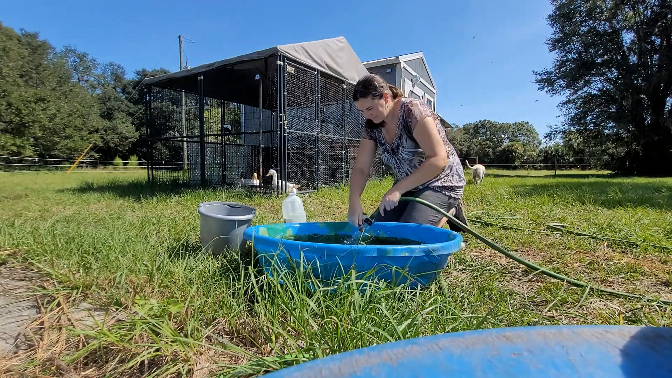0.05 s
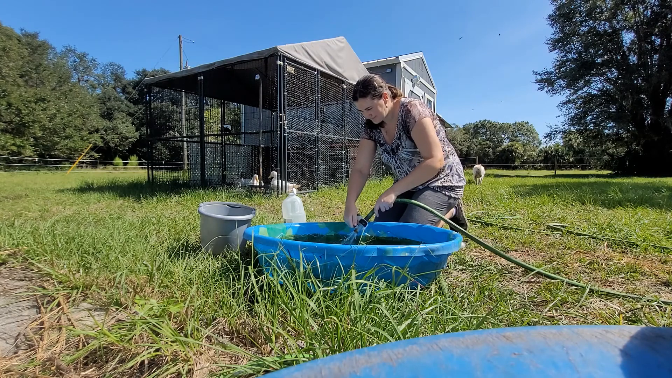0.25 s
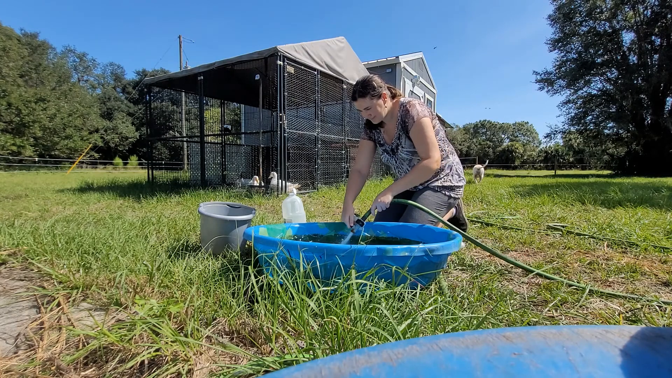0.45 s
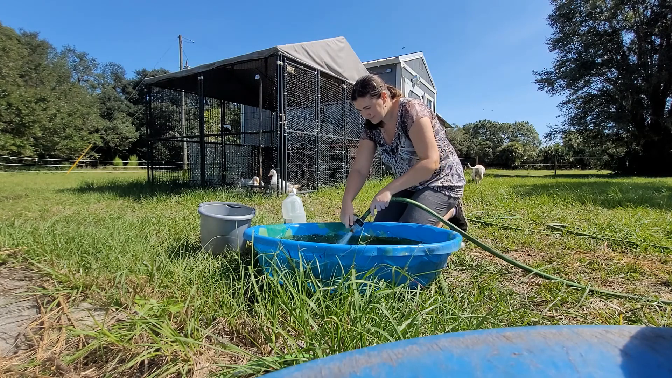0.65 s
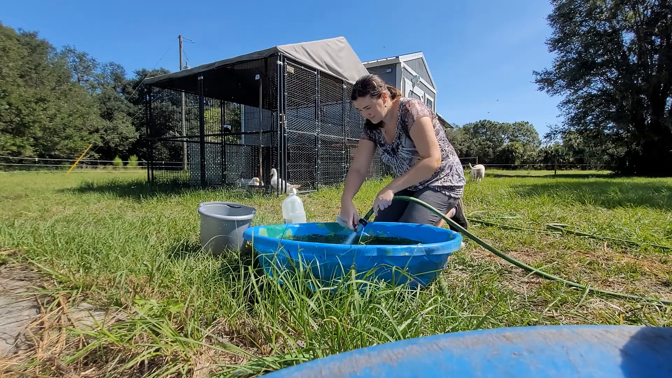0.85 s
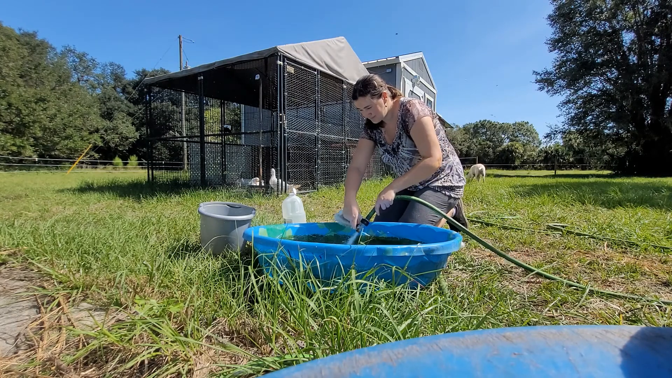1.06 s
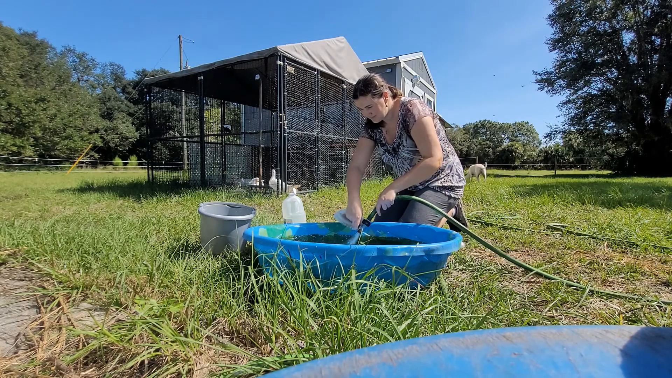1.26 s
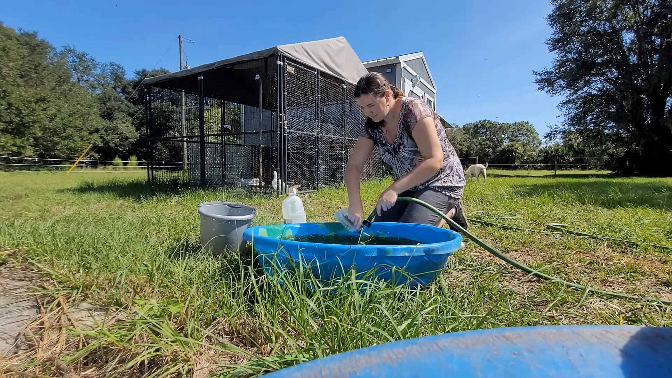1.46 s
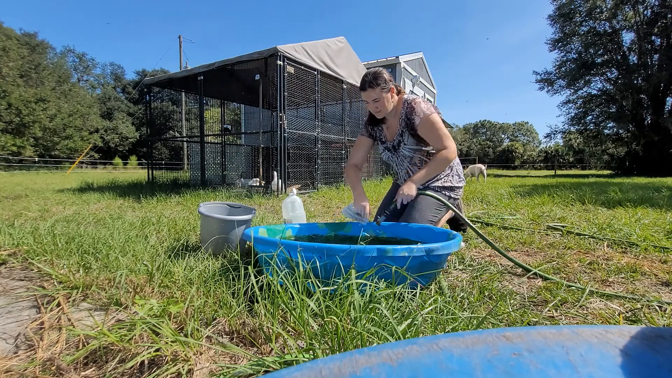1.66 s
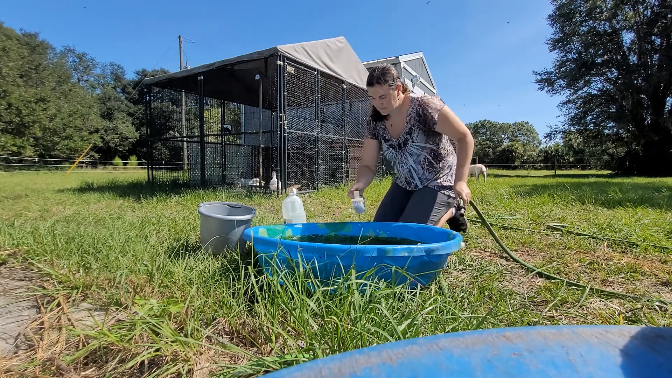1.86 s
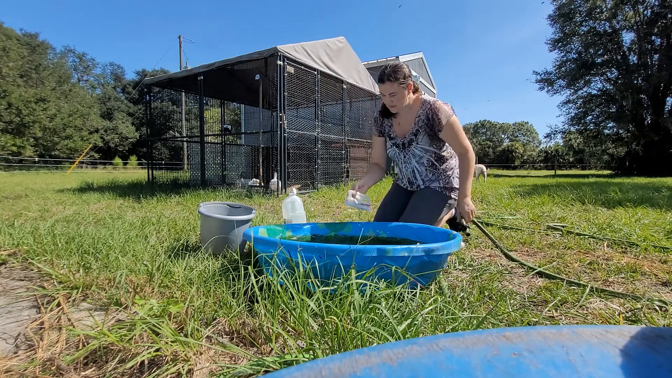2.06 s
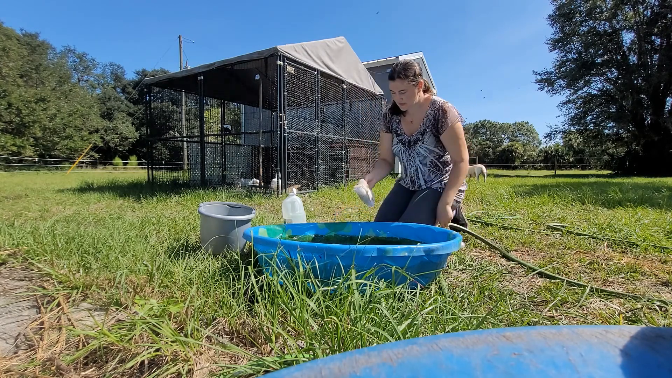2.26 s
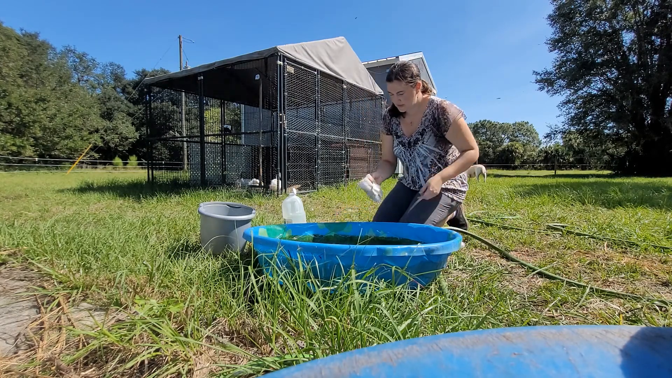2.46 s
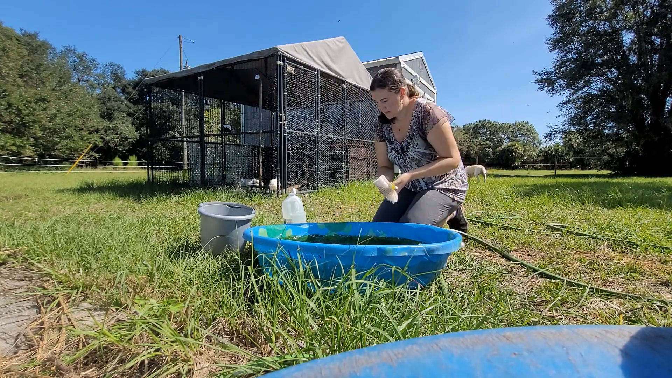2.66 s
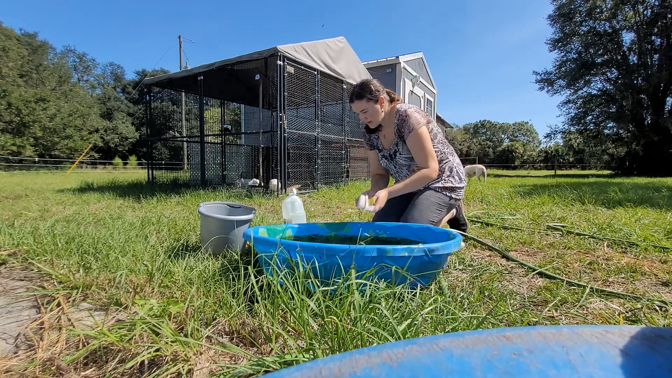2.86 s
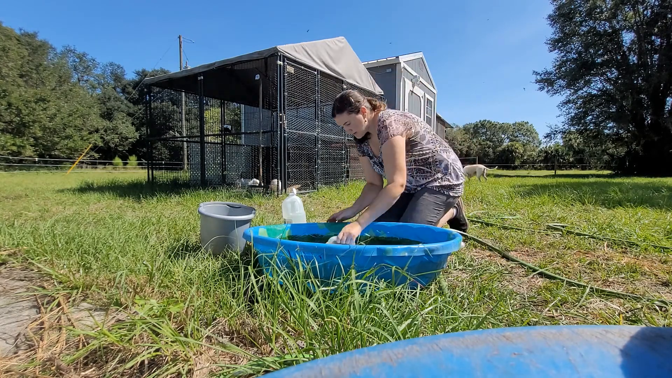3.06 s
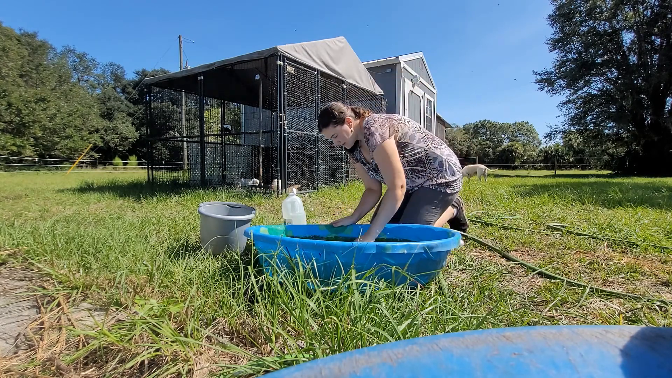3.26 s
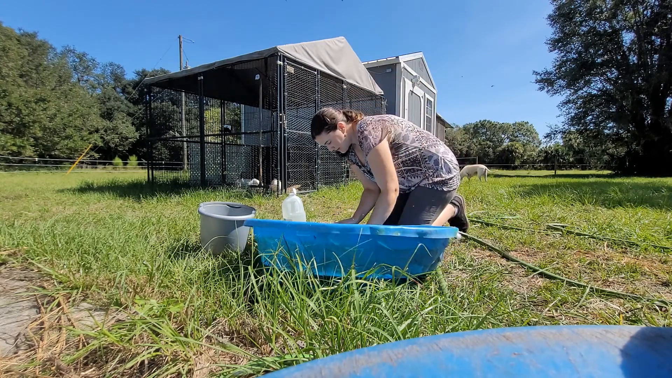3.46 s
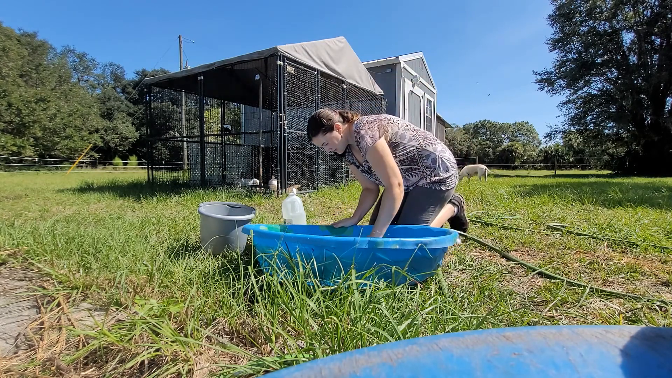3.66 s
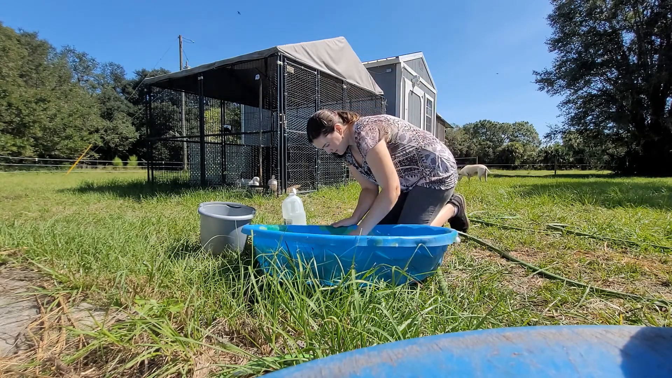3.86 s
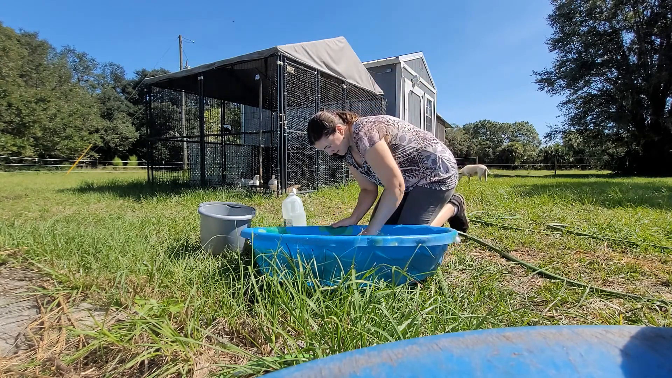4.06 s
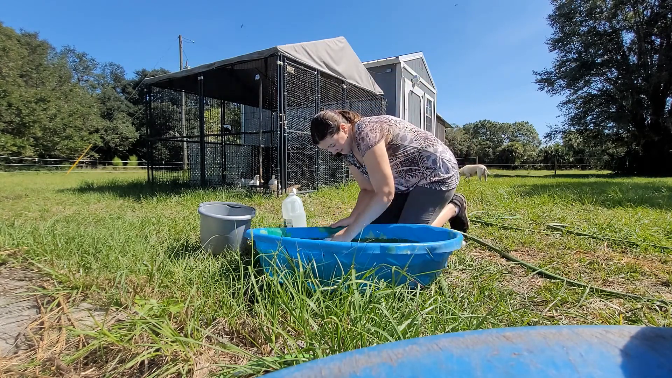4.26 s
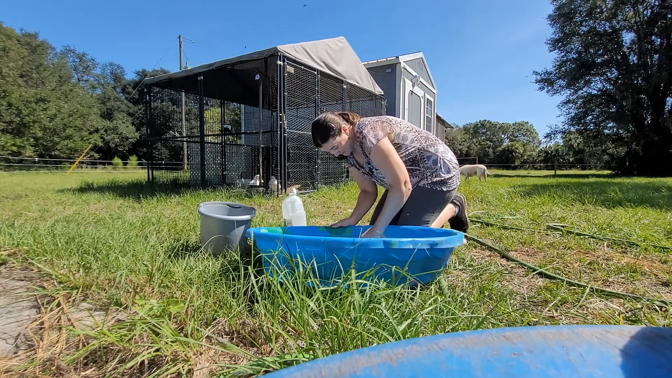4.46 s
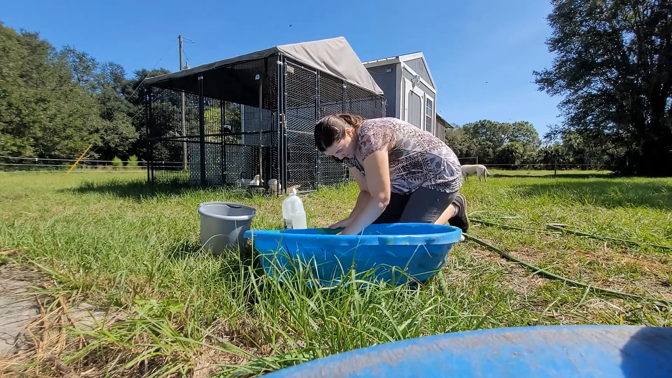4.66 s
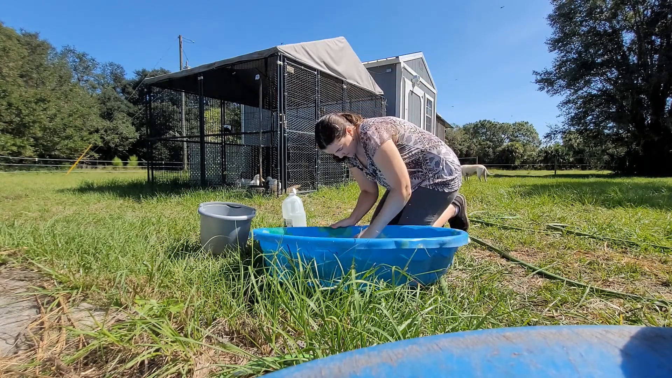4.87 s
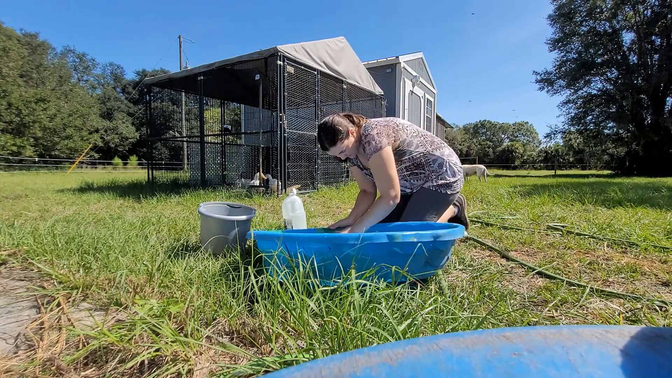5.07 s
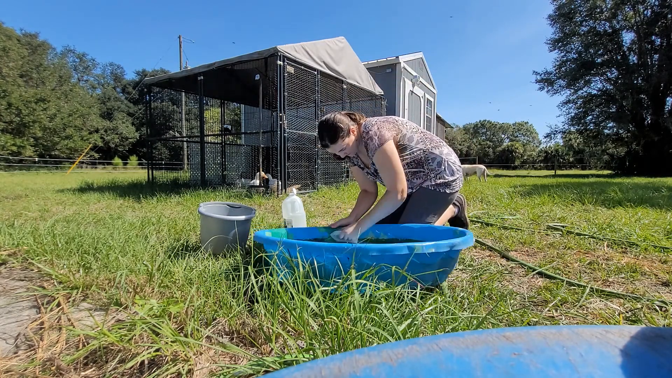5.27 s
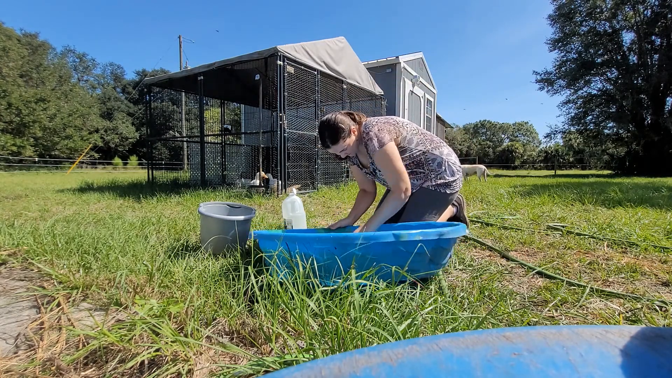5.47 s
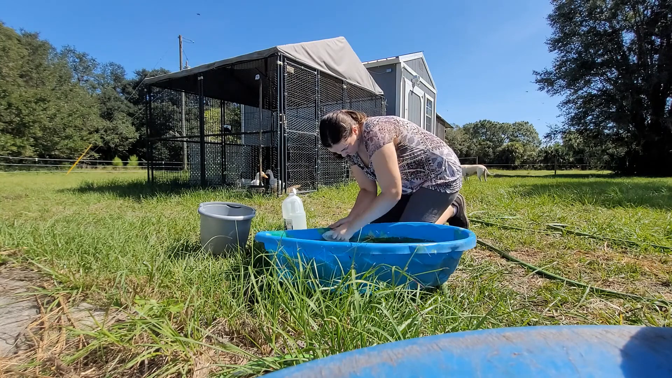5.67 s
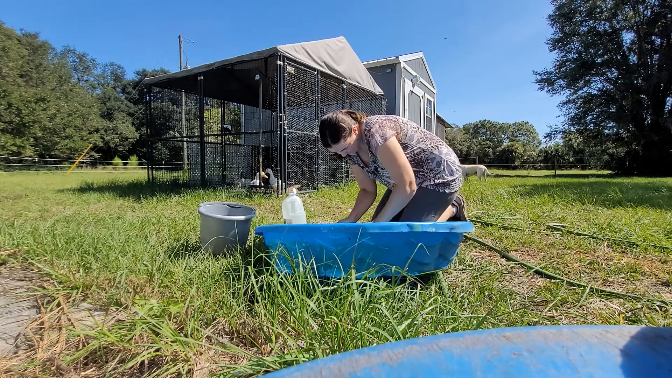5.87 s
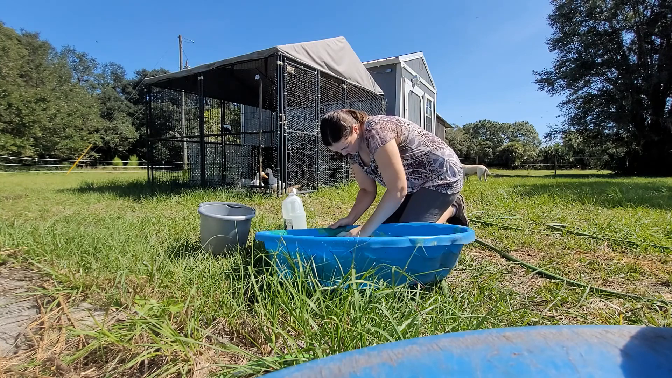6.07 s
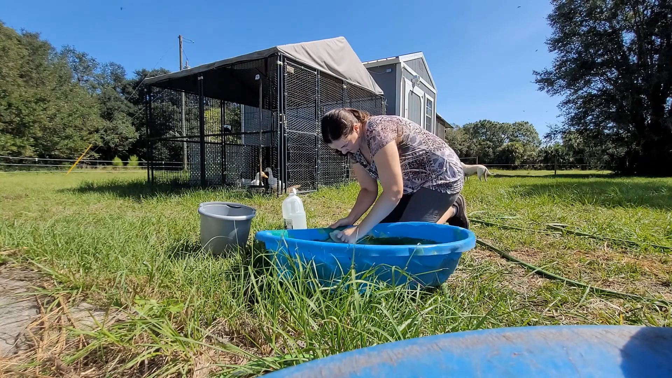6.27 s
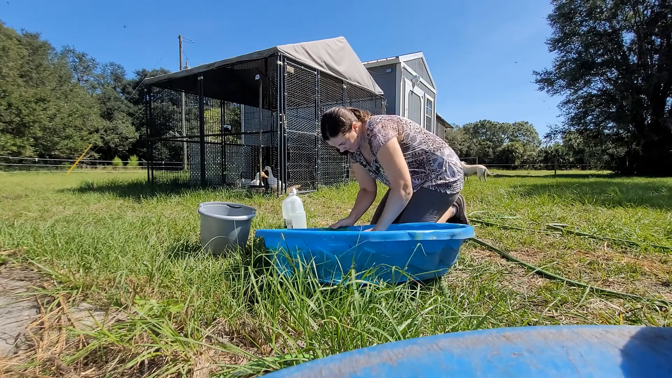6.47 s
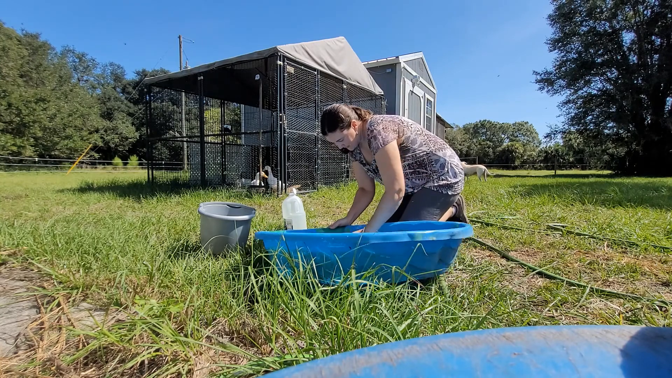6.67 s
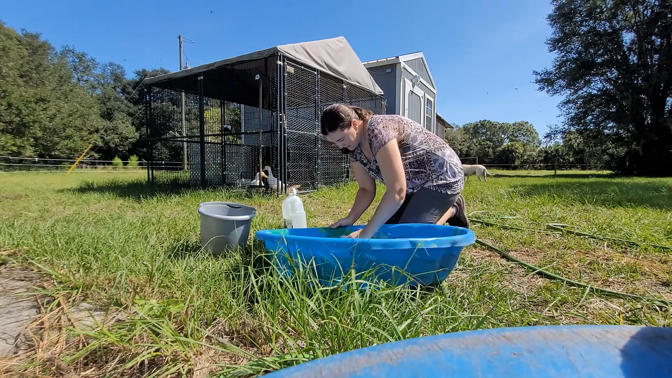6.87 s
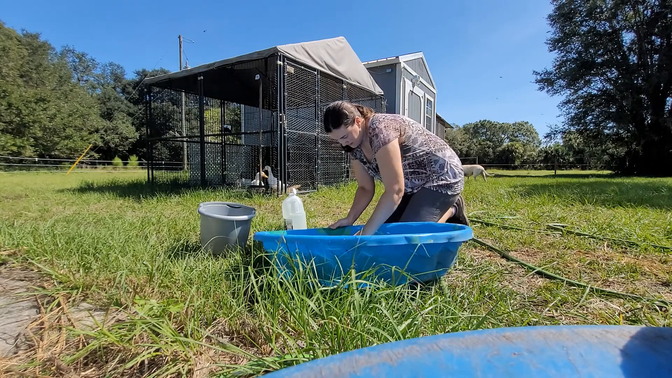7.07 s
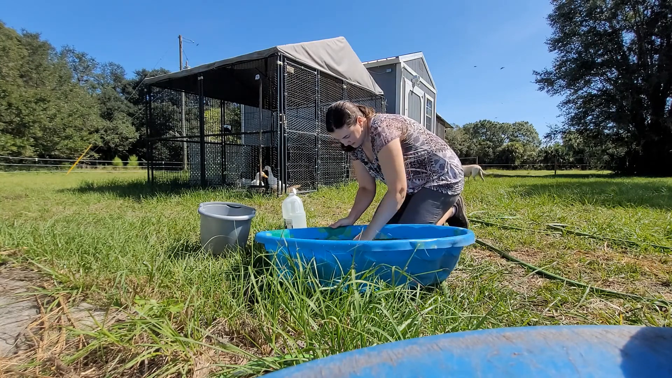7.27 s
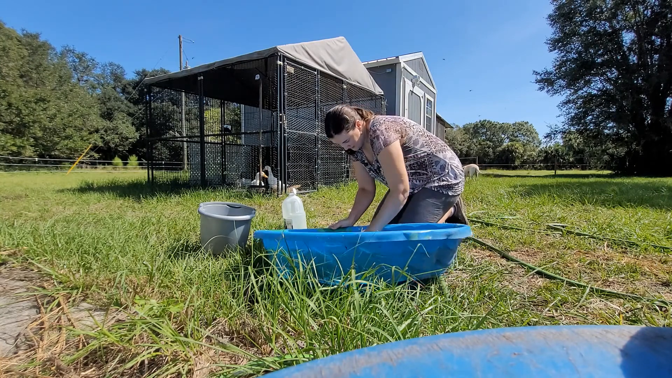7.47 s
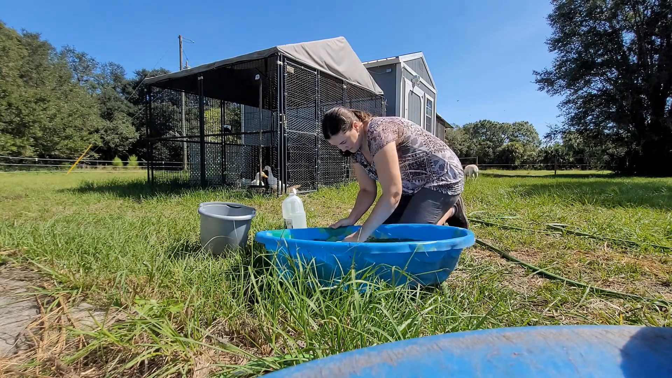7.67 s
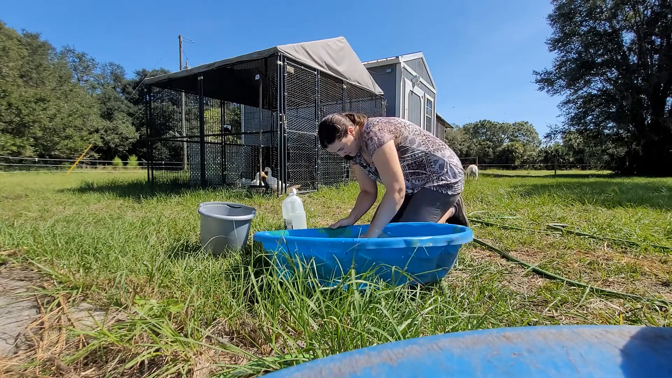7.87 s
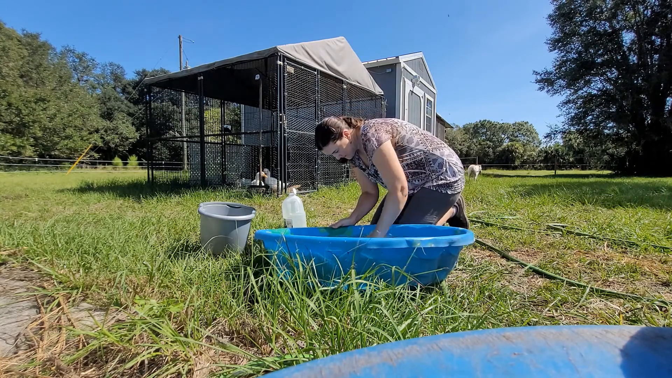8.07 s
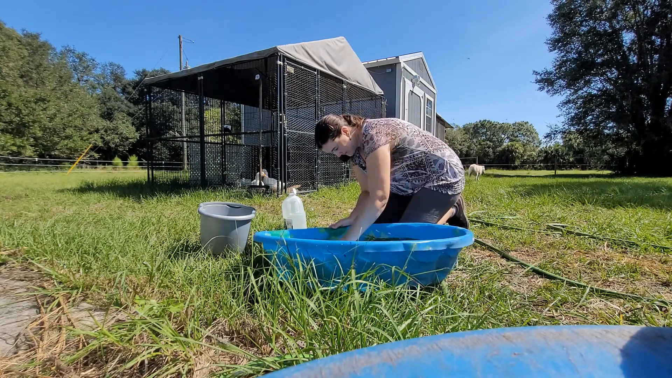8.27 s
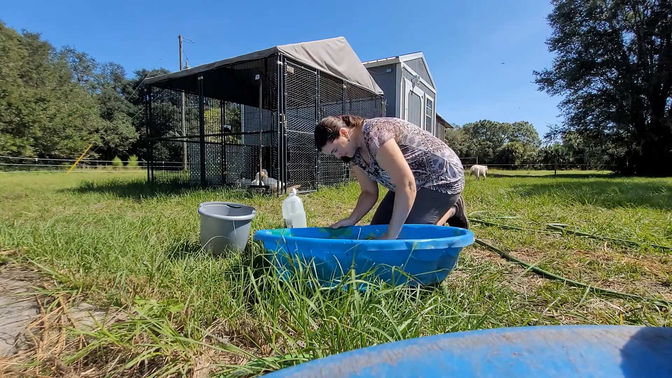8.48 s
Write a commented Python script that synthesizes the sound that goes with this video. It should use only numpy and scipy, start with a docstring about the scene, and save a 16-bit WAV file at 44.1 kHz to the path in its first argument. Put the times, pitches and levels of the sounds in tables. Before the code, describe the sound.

Outdoors, a water jet splatters against a plastic tub and stops; after a quiet pause with faint insects, brisk hollow brush scrubbing begins.

```python
"""A garden hose jets into a shallow plastic pool on grass, amid insects, a far motor and traffic.
Clicks of water drum the wall and hiss as spray, air pockets ring, and the jet is shut off.
The hose drags as it is laid down; then come two light wipes and a stiff brush scrubbing to and fro,
with knocks on the wall and low thumps. Rubbing is made of clicks, knocks of ringing wall modes.
Throughout, two unlike microphone ports listen: the left hears the bass, the right the treble."""
import sys
import numpy as np
from scipy import signal
from scipy.fft import rfft, irfft, next_fast_len
from scipy.io import wavfile
from scipy.ndimage import uniform_filter1d

SR = 44100
rng = np.random.default_rng(int(sys.argv[2]) if len(sys.argv) > 2 else 0)


def persist_wave(psi):
    """Save psi, clipped to +-1, as 16-bit WAV."""
    counts = np.round(np.clip(psi, -1, 1) * 32767).astype(np.int16)
    wavfile.write(sys.argv[1], SR, np.atleast_2d(counts).T)


N = 376613
SIZE = next_fast_len(N + SR // 2)  # transform length, with room for tails
HZ = np.maximum(np.arange(SIZE // 2 + 1) * SR / SIZE, 1)  # frequencies of a spectrum
TIME = np.arange(N) / SR


def from_db(db):
    """Turn a level in dB into a gain."""
    return 10 ** (np.asarray(db) / 20)


def in_time(rows):
    """Join the dB columns by straight lines, as gains; silent outside the rows."""
    s, *columns = np.transpose(rows)
    return [from_db(np.interp(TIME, s, column, left=-150, right=-150)) for column in columns]


def over_hz(points):
    """Read a table's columns at every frequency, along a log axis."""
    hz, *columns = np.transpose(points)
    return [np.interp(np.log(HZ), np.log(hz), column) for column in columns]


def peak(hz, width):
    """Response of one resonance, 1 on top."""
    return 1 / (1 + 2j * (HZ - hz) / width)


def unit(response):
    """Scale a filter so that white noise of rms 1 leaves with rms 1."""
    return response / np.sqrt(np.mean(abs(response) ** 2))


def coloured(points):
    """Make a filter of unit strength from a colour table."""
    return unit(from_db(over_hz(points)[0]))


def drift(rate):
    """Slow random wander of spread 1, changing about rate times a second."""
    steps = rng.standard_normal(int(N / SR * rate * 2) + 2)
    wander = np.interp(TIME * rate * 2, np.arange(len(steps)), steps)
    return wander * np.sqrt(1.5)  # makes up for the spread lost between steps


def grains(per_s, spread_db):
    """Two unrelated showers of random clicks of uneven size, rms 1."""
    boost_db = spread_db * np.minimum(rng.exponential(1, (2, N)), 4)
    sizes = from_db(boost_db) * rng.standard_normal((2, N))
    shower = sizes * (rng.random((2, N)) < per_s / SR)
    return shower / shower.std()


# Ringing of the pool wall under steady rubbing or splashing:
# (frequency [Hz], width [Hz], lift above the colour at full ringing [dB])
WALL_RINGING = [(245.5, 34, 3), (297.5, 57, 4), (431.4, 34, 8.5), (486, 24, 5), (622, 15, 8.5),
                (712, 25, 6), (847.6, 64, 8), (954, 36.2, 7), (1085.4, 22.4, 11.5), (1180, 27, 7),
                (1300, 24, 4), (1465, 35, 7), (1692, 77, 5.5), (2155, 18.6, 7.5), (2330, 40, 4.5),
                (2920, 55, 4.5)]


def rubbed(gains, colours, per_s, spread_db, flutter_db, ringing):
    """Clicks drive the wall: its low and high parts drum, the contact hisses; gives a pair of spectra."""
    wall = 1 + ringing * sum((from_db(db) - 1) * peak(hz, width) for hz, width, db in WALL_RINGING)
    out, shared = 0, drift(25.0)
    for gain, colour, rate, flutter in zip(gains, colours, per_s, flutter_db):
        unsteady_db = flutter * (0.5 * shared + 0.53 * drift(40.0))
        force = gain * from_db(unsteady_db) * grains(rate, spread_db)
        out = out + rfft(force, SIZE) * unit(from_db(over_hz(colour)[0]) * wall)
    return out


# The jet: (time [s], low wall drumming [dB], high wall drumming [dB], spray [dB])
JET_LEVELS = [(0.0, -37, -33.5, -38.5), (0.058, -35.5, -37.5, -39), (0.328, -39, -38, -36.5),
              (0.342, -28.5, -29, -32), (0.378, -32, -31.5, -29.5), (0.414, -27, -22, -31),
              (0.46, -25.5, -31, -33.5), (0.478, -27, -24, -33), (0.59, -27, -30.5, -34),
              (1.298, -27, -27, -32.5), (1.358, -24.5, -26, -31.5), (1.424, -33, -34.5, -35.5),
              (1.47, -54.5, -58, -58), (1.62, -79, -85, -84)]
# Colours of its low drumming, high drumming and spray: (frequency [Hz], relative level per Hz [dB])
JET_LOW_COLOUR = [(53, -65), (90, -25), (173, -23.5), (225, -7), (418, -3), (700, -3.5), (910, -31.5),
                  (1540, -120)]
JET_HIGH_COLOUR = [(410, -22.5), (700, -9.5), (936, -3), (1200, -13.5), (1560, -34), (2640, -120)]
SPRAY_COLOUR = [(710, -35.5), (1200, -12), (1340, -3.5), (1540, -9.5), (2200, -6), (3420, -13.5),
                (5430, -13), (6450, -17), (9420, -21), (15100, -22), (15800, -23.5)]


def jet():
    """Water hits the pool in many small clicks that drum the wall and spray, and drags air under."""
    gains = in_time(JET_LEVELS)
    colours = (JET_LOW_COLOUR, JET_HIGH_COLOUR, SPRAY_COLOUR)
    splashing = rubbed(gains, colours, per_s=(2500.0, 6000.0, 30000.0), spread_db=2.0,
                       flutter_db=(.8, .8, .5), ringing=1.0)
    return splashing + bubbles(gains[0], per_s=550.0, cycles=32.0, level_db=0.0)


def bubbles(gain, per_s, cycles, level_db):
    """Air dragged under the water: pockets of many sizes ring, the higher ones more softly."""
    pitches = np.geomspace(400, 2300, num=18)
    shower = gain * grains(per_s, 1.5)
    dealt = rng.integers(0, len(pitches), N)  # which pocket size each click sets ringing
    rings = 0
    for k, hz in enumerate(pitches):
        ring = unit(peak(hz, hz / cycles)) * (400 / hz) ** 0.75
        rings = rings + rfft(shower * (dealt == k), SIZE) * ring
    return from_db(level_db) * rings


# Colour of the low noise under the pool: (frequency [Hz], relative level per Hz [dB])
SHAKE_COLOUR = [(20, -31), (35, -10), (55, 4), (90, -2.5), (125, -2.5), (180, -39)]
SHAKE_REST_DB, SHAKE_WORKED_DB = -61.5, -19.5  # at rest; relative to the low drumming
SHAKE_SMOOTH_S = .15


def shake(work):
    """Low noise under the pool swells while it is rubbed, unrelated in the two draws."""
    smooth_work = uniform_filter1d(work, int(SHAKE_SMOOTH_S * SR))
    gain = from_db(SHAKE_REST_DB) + from_db(SHAKE_WORKED_DB) * smooth_work
    return rfft(gain * rng.standard_normal((2, N)), SIZE) * coloured(SHAKE_COLOUR)


# Colour of the far traffic: (frequency [Hz], relative level per Hz [dB])
TRAFFIC_COLOUR = [(10, -53.5), (20, -33.5), (35, -24), (57, 6.5), (80, -14.5), (120, -7.5), (190, -14.5),
                  (260, -9), (330, -16.5), (500, -24.5), (1000, -35), (1800, -34), (3000, -48.5)]
TRAFFIC_DB = -56


def traffic():
    """Far traffic is steady noise, mostly low."""
    return rfft(rng.standard_normal((2, N)) * from_db(TRAFFIC_DB), SIZE) * coloured(TRAFFIC_COLOUR)


# Motor tones: (frequency before wavering [Hz], rms level before swell and drift [dB])
MOTOR_TONES = [(147, -55), (238, -74.5), (325, -67)]
# Swell of the motor: (time [s], level change [dB])
MOTOR_SWELL = [(0, -0.5), (.9, 6), (1.7, -2), (2.3, -2.5), (2.8, -6.5), (3.3, 0), (4, 4), (5, 7.5),
               (6.3, 0), (7.3, 1.5), (8.54, 1)]


def motor():
    """The motor's tones waver together in pitch as its speed drifts."""
    speed = 1 + 0.01108 * drift(4.0)
    swell = in_time(MOTOR_SWELL)[0]
    tones = 0
    for hz, db in MOTOR_TONES:
        wave = np.sqrt(2) * np.sin(2 * np.pi * np.cumsum(hz * speed) / SR)
        tones = tones + wave * from_db(db + drift(5)) * swell
    return rfft(tones, SIZE)


# Insect choirs: (centre [Hz], width of the resonance before its fourth power [Hz],
# level before drift [dB], left minus right before the left port's deaf spot [dB])
CHOIRS = [(2695, 1400, -64, 22), (5260, 1600, -71, -9.5), (7500, 4080, -71, -35), (10400, 2200, -75, -38.5),
          (3950, 1400, -74, 5.5), (13300, 6600, -89, 12)]


def insect_choirs():
    """Many far insects blend into broad bands of noise, each with its own left-right balance."""
    out = 0
    for hz, width, db, balance_db in CHOIRS:
        sides = 2 * from_db([[min(balance_db, 0)], [-max(balance_db, 0)]])
        choir = rng.standard_normal((2, N)) * from_db(db + .8 * drift(1.3)) * sides
        out = out + rfft(choir, SIZE) * unit(peak(hz, width) ** 4)
    out[0] *= 1 - 0.76 * abs(peak(7880, 3000) ** 2)  # the left port is nearly deaf around here
    return out


# Thin insect tones: (frequency before wandering [Hz], peak level before swell and drift [dB])
CHIRRS = [(4996, -78), (5534, -78), (5922, -78), (6385, -79), (6944, -77), (7402, -78), (7747, -79),
          (8048, -78)]
# Their shared swell and fade: (time [s], level change [dB])
CHIRR_SWELL = [(0, 0), (1.5, 2), (2.3, 1), (2.7, -5), (4, -5), (5.5, 0), (6.1, 7), (7.5, 8), (8.54, 4)]


def insect_chirrs():
    """A few thin tones wander in pitch and level, on the right only."""
    swell = in_time(CHIRR_SWELL)[0]
    tones = np.zeros((2, N))
    for hz, db in CHIRRS:
        pitch = hz * (1 + .0008 * drift(1.0) + .0003 * drift(20))
        wave = np.sin(2 * np.pi * np.cumsum(pitch) / SR)
        tones[1] += wave * from_db(db + 4 * drift(1.5)) * swell
    return rfft(tones, SIZE)


# The hose drags on the pool as it is laid down:
# (time of the loudest point [s], low wall drumming [dB], high wall drumming [dB])
DRAGS = [(2.072, -51.5, -68.5), (2.286, -46, -59.5)]
DRAG_RISE_DB_PER_S, DRAG_FALL_DB_PER_S = 420, 600


def drags():
    """Gains of short scuffs that swell and die, drumming the wall without hiss."""
    out = np.zeros((3, N))
    for s, *level_db in DRAGS:
        fade_db = np.where(TIME < s, DRAG_RISE_DB_PER_S, DRAG_FALL_DB_PER_S) * abs(TIME - s)
        out[:2] += from_db(np.array(level_db)[:, None] - fade_db)
    return out


# Colours of low drumming, high drumming and bristle hiss: (frequency [Hz], relative level per Hz [dB])
RUB_LOW_COLOUR = [(53, -49.5), (90, -12.5), (173, -14), (246, -4.5), (408, -3), (700, -9.5), (910, -72),
                  (1540, -120)]
RUB_HIGH_COLOUR = [(410, -19.5), (700, -11), (859, 2), (946, -5), (1900, -13.5), (2470, -18), (4180, -120)]
BRISTLE_COLOUR = [(1120, -47), (1900, -8.5), (2270, -7), (3260, -13.5), (4180, -9.5), (6460, -14.5),
                  (7570, -14), (8800, -17.5), (15100, -21), (15800, -34)]


def rubbing(contact):
    """Hose and brush rub in many small clicks that drum the wall, hiss, and ring air pockets."""
    colours = (RUB_LOW_COLOUR, RUB_HIGH_COLOUR, BRISTLE_COLOUR)
    rub = rubbed(contact, colours, per_s=(3000.0, 6000.0, 20000.0), spread_db=0.82,
                 flutter_db=(1.5, 1.4, .9), ringing=0.76)
    return sheen(rub) + bubbles(contact[1], per_s=200.0, cycles=27.0, level_db=-0.72)


# Lift of the sound above about 8 kHz: (time [s], level change before flicker [dB])
SHEEN_LIFT = [(3.1, -4), (4, 2.5), (4.8, -1), (5.4, 4), (6, -3.5), (6.6, -2), (7.1, 0.5), (7.8, -1),
              (8.54, -3)]
# Edges of the treble bands, the last band open above: (frequency [Hz])
RASP_EDGES_HZ = (1500, 2500, 3800, 5800, 8000)
RASP_SWING_DB, RASP_PER_S = 1.76, 7.0


def sheen(spectra):
    """The treble rasps unevenly: each band flickers apart, and the top one also follows its lift."""
    above = [1 / (1 + (hz / HZ) ** 6) for hz in RASP_EDGES_HZ]
    bands = [low - high for low, high in zip(above, above[1:])] + above[-1:]
    gains_db = [RASP_SWING_DB * drift(RASP_PER_S) for _ in bands]
    gains_db[-1] = gains_db[-1] + np.interp(TIME, *np.transpose(SHEEN_LIFT))
    treble = sum(irfft(spectra * band, SIZE)[:, :N] * from_db(db) for band, db in zip(bands, gains_db))
    return spectra * (1 - above[0]) + rfft(treble, SIZE)


# Two light, slow wipes:
# (time [s], low wall drumming [dB], high wall drumming [dB], bristle hiss [dB])
WIPES = [(3.13, -67, -84, -74), (3.18, -42.5, -48, -66), (3.26, -36, -46.5, -53), (3.288, -39, -44, -51),
         (3.448, -51.5, -60, -59), (3.568, -42, -45.5, -55), (3.598, -46.5, -53.5, -58),
         (3.642, -41, -45.5, -52.5), (3.666, -40, -49.5, -50), (3.774, -51.5, -57.5, -58),
         (3.844, -52, -60, -63), (3.88, -66, -70, -76), (3.95, -60, -72, -77)]


def wipes():
    """Gains of the light wipes, one for each layer of the rubbing."""
    return in_time(WIPES)


# Knocks on the pool wall: (time [s], level before trim and mode strengths [dB],
# brightness tilt [dB/octave], time constant of the rattle [s])
KNOCKS = [(3.172, -41, 8, 0.014), (3.977, -19, -0.5, 0.041), (4.077, -16.5, 3, 0.016),
          (4.251, -16, 1.5, 0.0086), (4.275, -10, -9.5, 0.0071), (4.595, -6.5, -3.5, 0.015),
          (4.736, -20.5, -8, 0.011), (5.293, -7.5, -3, 0.014), (5.435, -22.5, 3.5, 0.029),
          (5.649, -10.5, -3, 0.01), (6.256, -16, -12, 0.0052), (6.569, -4, -1.5, 0.014),
          (6.849, -32, 5.5, 0.011), (7.063, -35, 7.5, 0.014), (7.334, -14, 0.5, 0.013),
          (7.824, -24, 0.5, 0.011), (8.054, -29.5, 0, 0.0095), (8.453, -18, 0.5, 0.01),
          (8.495, -22, -0.5, 0.014)]
# Modes of the knocked pool: (frequency [Hz], level before tilt and luck [dB], time to fall 60 dB [s])
POOL_MODES = [(247, -3.5, 0.066), (296, -3, 0.06), (356, -7, 0.074), (423.5, -2.5, 0.051), (531, -6, 0.052),
              (636, -13.5, 0.057), (670, -16, 0.15), (863, -2.5, 0.037), (877, -14.5, 0.054),
              (1125, -23, 0.041), (1260, -7, 0.014), (1580, -21, 0.023), (2080, -10.5, 0.01),
              (2430, -24, 0.013), (3120, -21, 0.013)]


def knocks():
    """A blow and a short rattle of contacts strike all wall modes, each with a strength of its own."""
    hz, level_db, t60 = np.transpose(POOL_MODES)
    t, out = np.arange(SR // 8) / SR, np.zeros((2, N + SR))
    rings = np.sin(2 * np.pi * hz[:, None] * t) * from_db(-60 * t / t60[:, None])
    for s, db, tilt, rattle_s in KNOCKS:
        luck = rng.standard_normal((2, len(hz)))
        struck = rng.random((1, len(t))) < 600.0 / SR  # about 600 contacts a second
        contacts = rng.standard_normal((2, len(t))) * struck
        force = 0.61 * contacts * np.exp(-t / rattle_s)
        force[:, 0] = 1  # the blow itself
        strength_db = db - 9.5 + level_db + tilt * np.log2(hz / 400) + 2.17 * abs(luck)
        strength = from_db(strength_db) * np.sign(luck)
        start = round(s * SR)
        out[:, start:start + 2 * len(t) - 1] += signal.fftconvolve(strength @ rings, force, axes=1)
    little_bass = 1 / (1 - 1j * 150 / HZ) ** 3  # a small wall
    soft_contact = 1 / (1 + 1j * HZ / 3200) ** 2
    return rfft(out[:, :N], SIZE) * little_bass * soft_contact


# Brush strokes, each lasting until the next: (start [s], low wall drumming [dB],
# high wall drumming [dB], bristle hiss [dB], share of the stroke where it is fastest [0-1],
# dip at the opening turn before each layer's share [dB])
STROKES = [(4.01, -35, -37, -44.0, 0.55, -30), (4.193, -33, -38, -41.5, 0.45, -10),
           (4.361, -33, -36, -40.5, 0.51, -17), (4.521, -36, -35, -42.5, 0.58, -10),
           (4.694, -31.5, -35, -41.0, 0.51, -10.5), (4.877, -33, -37, -41.5, 0.52, -11),
           (5.061, -33.5, -36, -41.0, 0.46, -15.5), (5.236, -32.5, -36, -44.5, 0.49, -8.5),
           (5.406, -33, -35.5, -42, 0.49, -11.5), (5.58, -32.5, -36, -44.0, 0.47, -9),
           (5.748, -34, -37, -42.0, 0.48, -13), (5.912, -36.5, -38.5, -43.5, 0.48, -10),
           (6.051, -34.5, -40.5, -46, 0.55, -6.5), (6.194, -37.5, -42.5, -47, 0.42, -11),
           (6.343, -38.5, -42, -47, 0.54, -10), (6.497, -31.5, -39, -44.5, 0.42, -24),
           (6.657, -37.5, -40.5, -45.0, 0.53, -12), (6.823, -33, -36, -44.0, 0.51, -13),
           (7.023, -36, -38, -42.5, 0.47, -18), (7.242, -34, -37, -41.5, 0.61, -8.5),
           (7.409, -35, -37.5, -43.0, 0.51, -18), (7.592, -37, -39, -44, 0.59, -6.5),
           (7.799, -35, -38, -44.5, 0.55, -6), (8.033, -39.5, -41.5, -46, 0.51, -10),
           (8.323, -35.5, -39.5, -43.5, 0.54, -14)]
# How steeply each layer follows the speed: (low [power], high [power], hiss [power])
SPEED_POWER = (1.1, 0.81, 1.11)
# How deeply each layer takes the dip: (low [factor], high [factor], hiss [factor])
TURN_SHARE = (0.99, 1.64, 1.4)
LAST_STROKE_END_S = 8.6


def strokes():
    """Gains of the brush layers: each stroke speeds up and slows down, leaving some sound at the turns."""
    start, *level_db, fastest, dip_db = np.transpose(STROKES)
    level_db, turns = np.array(level_db), np.append(start, LAST_STROKE_END_S)
    k = np.clip(np.searchsorted(turns, TIME) - 1, 0, len(start) - 1)  # which stroke
    done = np.clip((TIME - turns[k]) / np.diff(turns)[k], 0, 1)
    bend = np.log(.5) / np.log(fastest[k])  # puts the top of the half sine at the fastest point
    speed = abs(np.sin(np.pi * done ** bend))
    drive = speed ** np.array(SPEED_POWER)[:, None]
    left_db = [np.interp(TIME, start, db + share * dip_db, left=-150)
               for db, share in zip(level_db, TURN_SHARE)]
    return from_db(left_db) * (1 - drive) + from_db(level_db[:, k]) * drive


# Low thumps through the ground: (time [s], level before the swell's shape [dB], frequency [Hz])
THUMPS = [(4.592, -26, 82), (7.181, -43, 127), (7.623, -33, 61.4), (7.916, -27.5, 61.5),
          (7.975, -22.5, 80.5)]


def thumps():
    """A low wave swells and dies within a few cycles, alike in both draws."""
    out = np.zeros(N)
    for s, db, hz in THUMPS:
        cycles = np.clip((TIME - s) * hz, 0, None)
        out += from_db(db) * np.sin(2 * np.pi * cycles) * cycles * np.exp(1 - cycles * 1.37)
    return rfft([out, out], SIZE)


# The ports for the jet, for the worked pool, and for far traffic and motor:
# (frequency [Hz], left minus right [dB], likeness [0-1], phase by which the left leads [rad])
JET_PORTS = [(40, 22, .3, 0), (90, 22, .3, 0), (150, 17, .7, .1), (250, 12, .9, .1), (400, 3.5, .9, 0),
             (600, 1, .85, .35), (900, 2, .85, .5), (1300, 4, .6, 1.5), (1800, 1, .5, 4.3),
             (2300, -1, .55, 4.3), (2800, -5, .4, 4.6), (3300, -4, .1, 5), (4500, -16, .1, 5),
             (6000, -22, 0, 5), (7000, -50, 0, 5), (8800, -45, 0, 5), (10500, -9, 0, 5), (16000, -6, 0, 5)]
BRUSH_PORTS = [(40, 24, .2, 0), (90, 24, .25, 0), (150, 19, .65, .1), (250, 14, .72, .1), (400, 4, .76, 0),
               (600, 3, .73, .3), (900, 2, .67, 1.1), (1300, 4, .3, 2), (1800, 0, .3, 3.9),
               (2300, 0, .48, 3.9), (2800, -4, .35, 4.6), (3300, -4, .1, 5), (4500, -15, .1, 5),
               (6000, -22, 0, 5), (7000, -50, 0, 5), (8800, -45, 0, 5), (10500, -8, 0, 5),
               (16000, -5, 0, 5)]
FAR_PORTS = [(40.4, 31, .9, .3), (147, 20, 0.03, .3), (253, 17, 0.6, 0.57), (400, -0.5, 0.5, 0.32),
             (900, -1, 0.54, .9), (2000, -1, 0.2, 1.5)]


def ports(pair, table):
    """The left port takes the first draw; the right a share of it, shifted in phase, and of the second."""
    balance_db, alike, lead = over_hz(table)
    alike, ratio = np.clip(alike, 0, 1), from_db(balance_db)
    right = alike * np.exp(-1j * lead) * pair[0] + np.sqrt(1 - alike ** 2) * pair[1]
    # the mean of both ports keeps the level
    scale = 2 / np.sqrt(1 + ratio ** 2 + 2 * ratio * alike * np.cos(lead))
    return np.array([ratio * pair[0], right]) * scale


def scene():
    """Pool sounds and field sounds reach the two ports."""
    contact = drags() + wipes() + strokes()
    worked = shake(contact[0]) + rubbing(contact) + knocks() + thumps()
    pool = ports(jet(), JET_PORTS) + ports(worked, BRUSH_PORTS)
    field = ports(traffic() + motor(), FAR_PORTS) + insect_choirs() + insect_chirrs()
    return irfft(pool + field, SIZE)[:, :N]


CUTOFF_HZ = 15830


def record(dry):
    """The top of the treble is cut steeply."""
    return signal.sosfilt(signal.ellip(14, .2, 75, CUTOFF_HZ, fs=SR, output="sos"), dry)


dry = scene()
out = record(dry)
persist_wave(out)
```